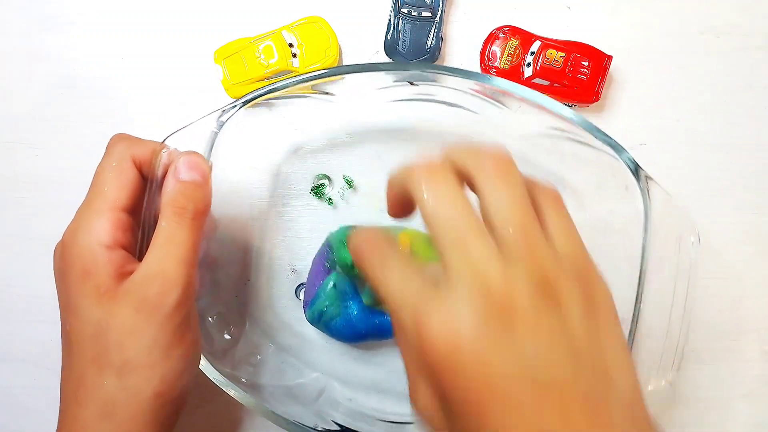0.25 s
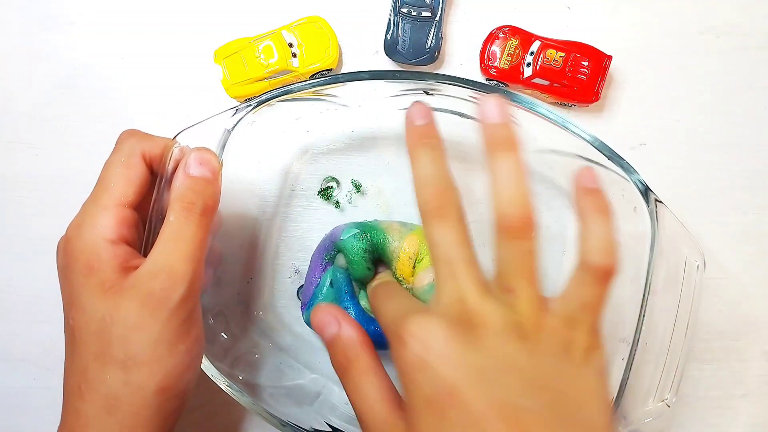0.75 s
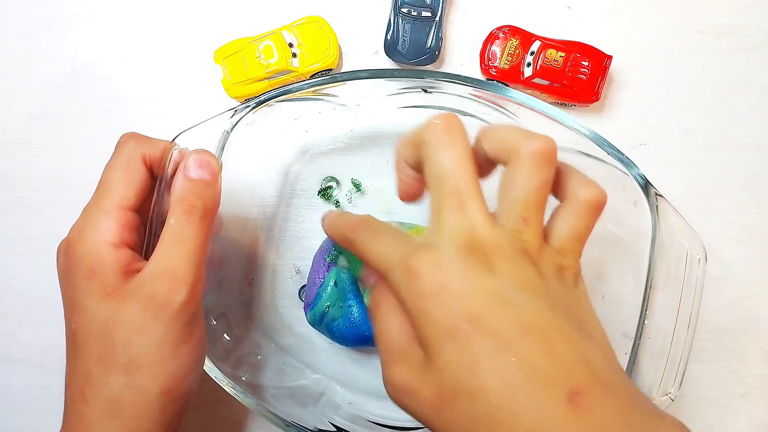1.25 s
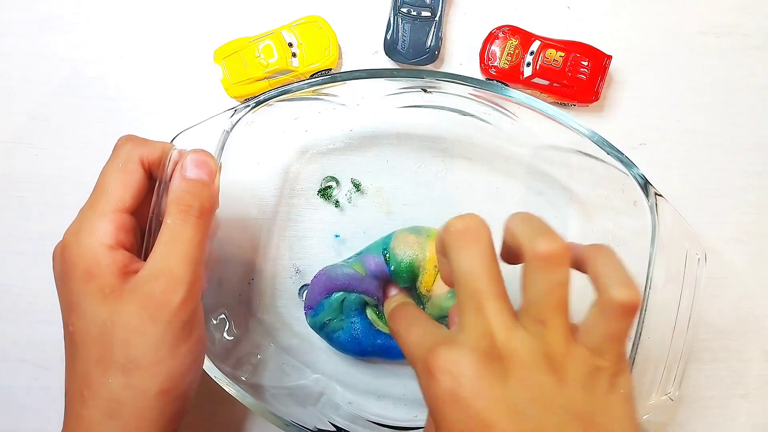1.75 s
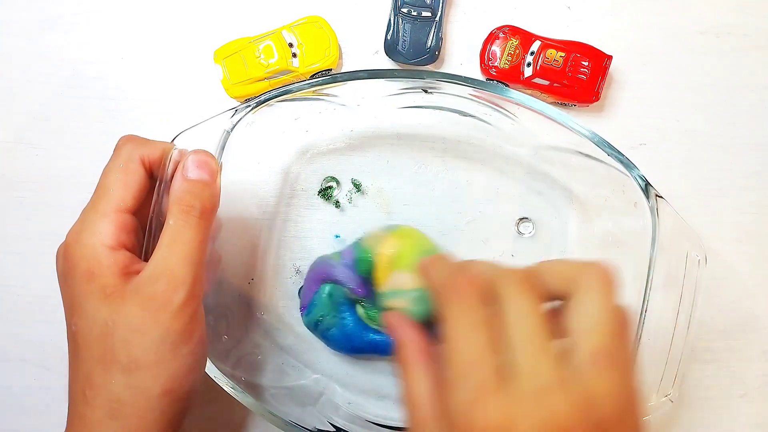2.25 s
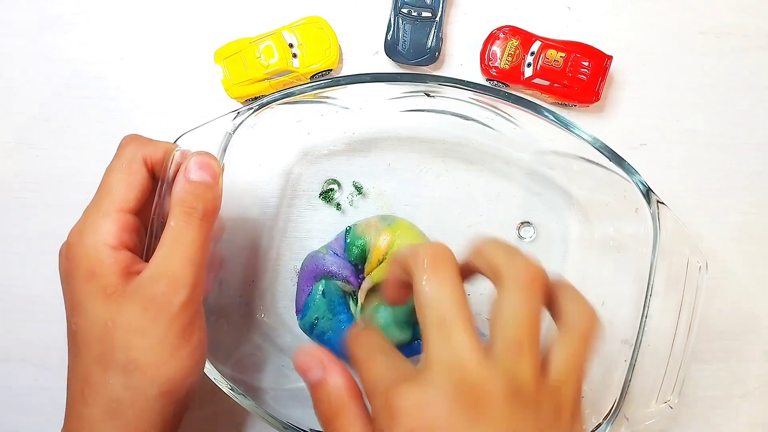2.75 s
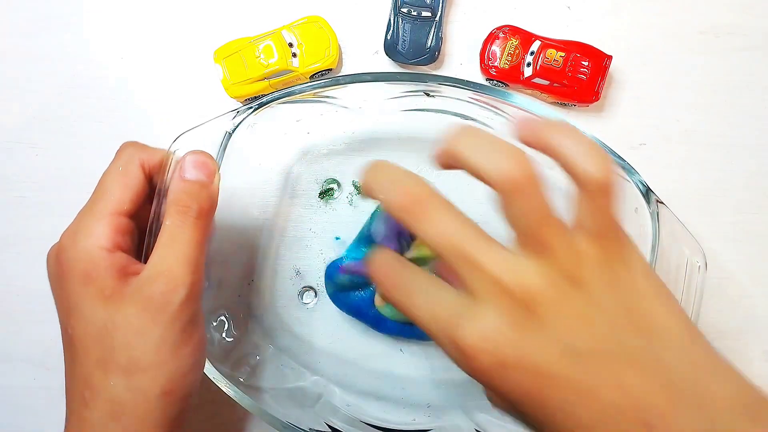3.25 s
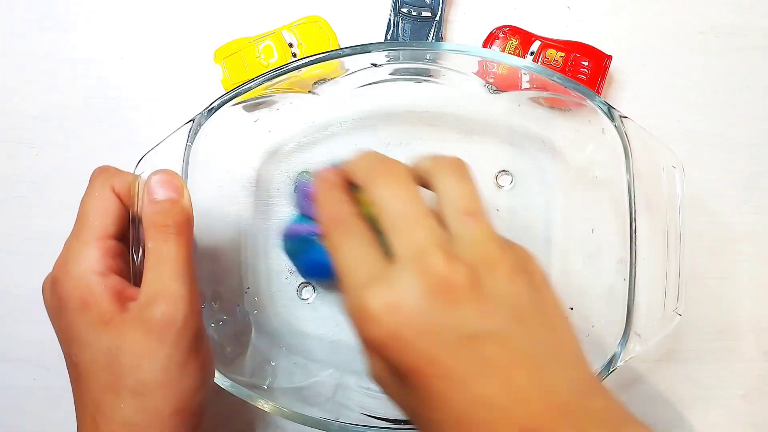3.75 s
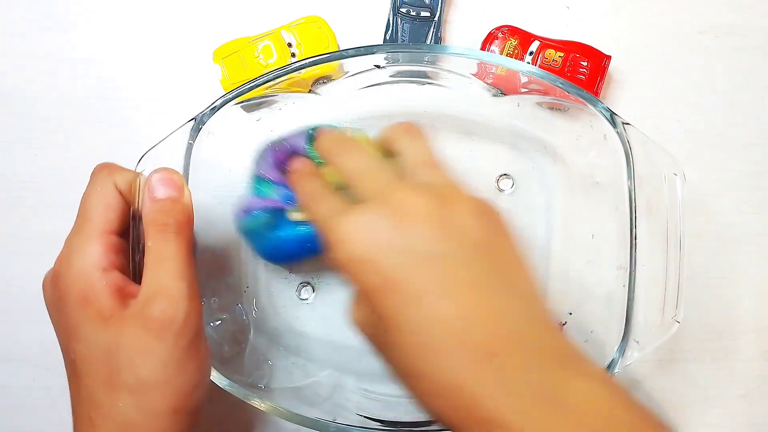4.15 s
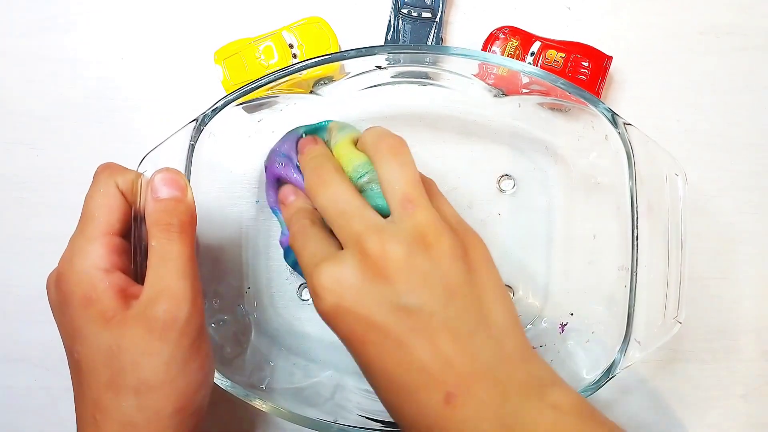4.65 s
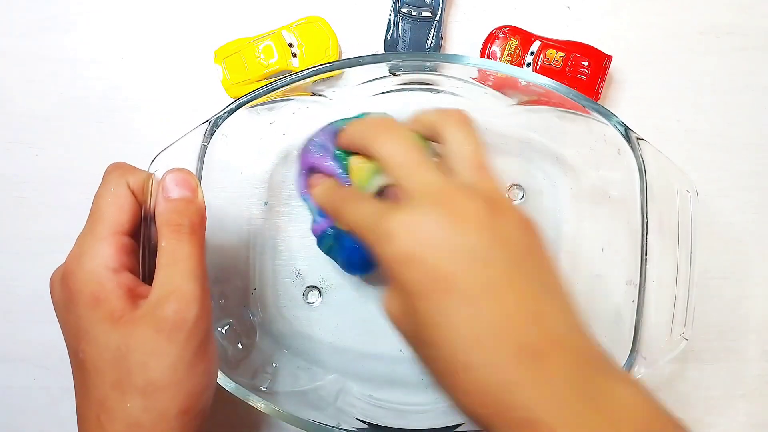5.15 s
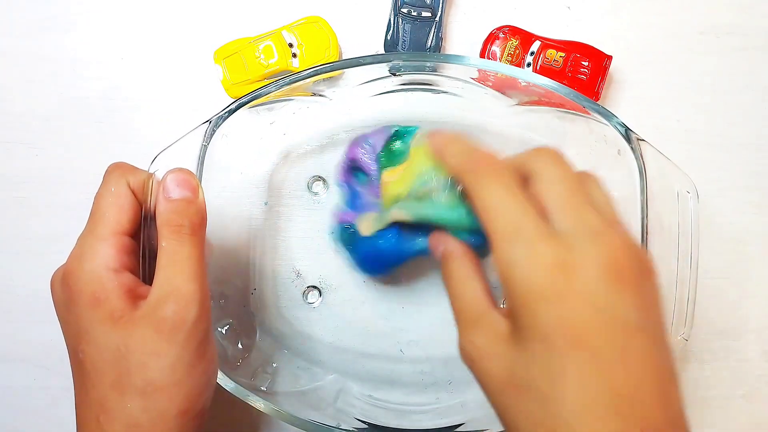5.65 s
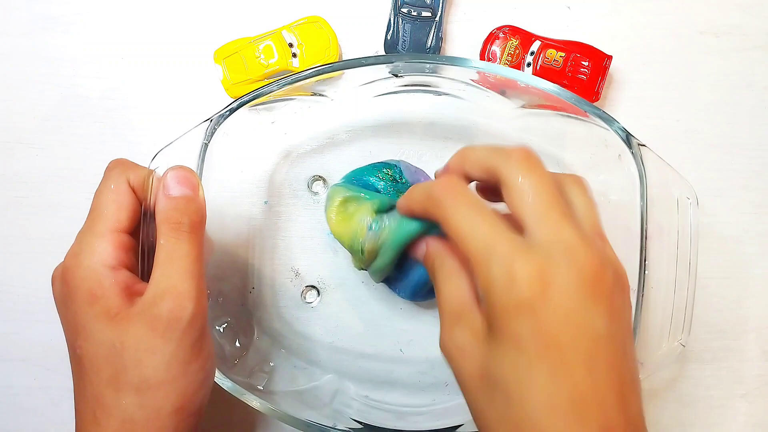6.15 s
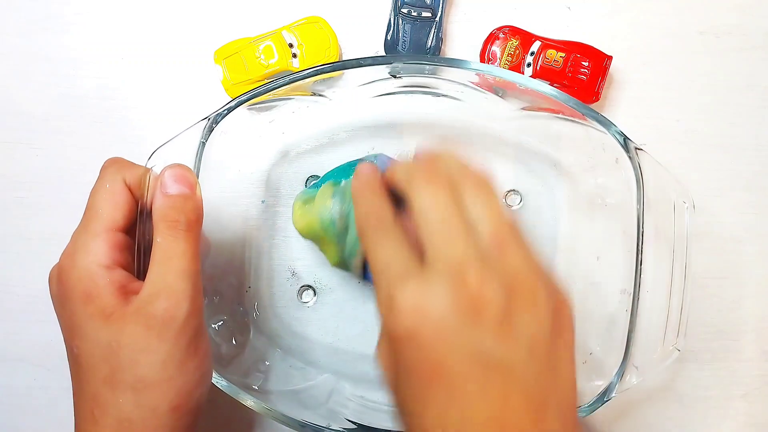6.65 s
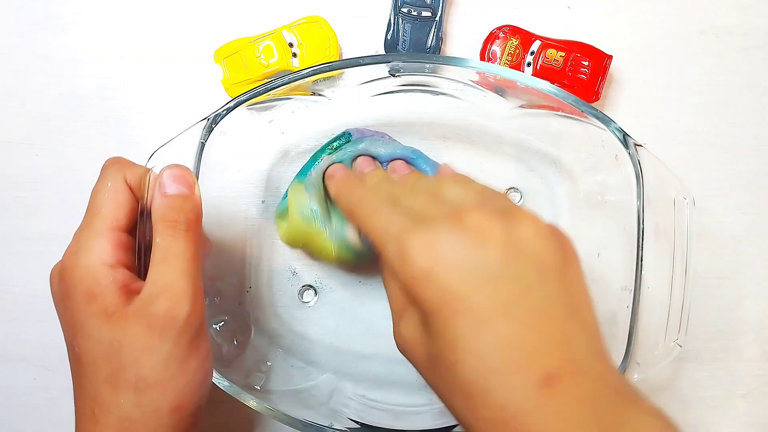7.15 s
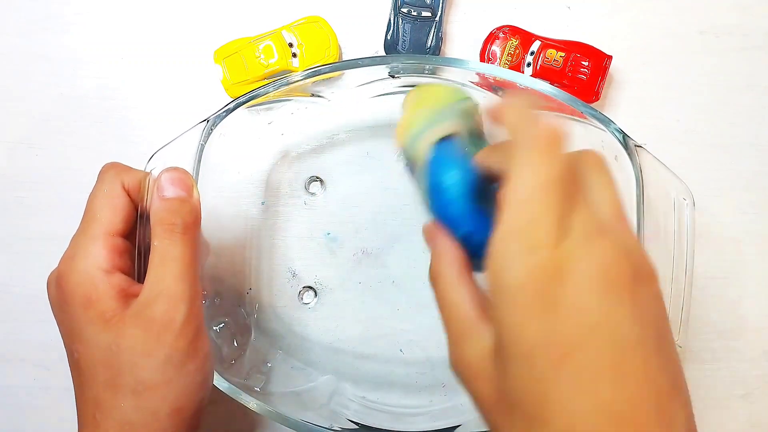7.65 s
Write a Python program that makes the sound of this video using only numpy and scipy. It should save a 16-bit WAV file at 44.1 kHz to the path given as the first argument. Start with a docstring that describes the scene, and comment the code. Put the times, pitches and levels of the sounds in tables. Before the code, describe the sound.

Close stereo microphone in a quiet room. Fingers squeeze slime in a glass dish with soft wet squishes and tiny air pops. Near one second a hard push thumps the table and taps the glass. Further low thumps, short dull drags of the dish and sticky peels follow, with squelches and pops continuing to the end.

```python
"""A quiet room: a hand kneads slime in a glass dish on a table, close to a two-port microphone.
Soft wet squeezes and small pops open the scene, and the dish drags in strokes from the start until
about 6.6 s; near 0.9 s a hard push thumps the table and taps the glass, and more thumps follow.
Squeezes, peels and pops run on to the end. Struck bodies are sums of decaying sines;
rubbing, hiss and puffs are shaped noise."""
import sys
import numpy as np
from scipy import signal
from scipy.fft import rfft, irfft
from scipy.io import wavfile
from scipy.ndimage import uniform_filter1d

SR = 44100
rng = np.random.default_rng(int(sys.argv[2]) if len(sys.argv) > 2 else 0)


def digitize_waveform(pressure):
    """Quantize a signal to 16-bit integers and store it at the path in sys.argv[1].

    Rows of a 2-D input are taken as channels; values are limited to [-1, 1].
    """
    field = np.atleast_2d(pressure).T
    bounded = np.clip(field, -1, 1)
    quanta = np.round(bounded * 32767).astype(np.int16)
    wavfile.write(sys.argv[1], SR, quanta)


N = 348390  # samples, 7.9 s
TOP_HZ = 15750  # upper limit of the sliding, peeling, hiss and room noise


def gain_of(db):
    """Amplitude factor for a level in dB."""
    return 10 ** (np.asarray(db) / 20)


def evened(x):
    """The same signal at rms 1."""
    return x / np.sqrt(np.mean(x ** 2) + 1e-20)


def read(points, hz):
    """Value of a (Hz, value) curve at hz, interpolated over log frequency."""
    point_hz, value = np.transpose(points)
    return np.interp(np.log(hz + 1), np.log(point_hz + 1), value)


def add(mix, start_s, sound):
    """Lays a sound into the mix, cut off at the end of the mix."""
    part = mix[round(start_s * SR):][:len(sound)]
    part += sound[:len(part)]


def shape(x, gain):
    """Multiplies the spectrum of x by gain(hz)."""
    size = x.shape[-1]
    return irfft(rfft(x) * gain(np.fft.rfftfreq(size, 1 / SR)), size)


def flutter(span_s, depth_db):
    """Random gain of rms 1 that changes within span_s."""
    wander = evened(uniform_filter1d(rng.standard_normal(N), int(span_s * SR)))
    return evened(gain_of(depth_db * wander))


def ring(modes):
    """Response of a body to one sharp blow: each mode is a sine dying by 60 dB in its t60."""
    t = np.arange(SR // 3) / SR
    return sum(gain_of(db - 60 * t / t60) * np.sin(2 * np.pi * hz * t) for hz, db, t60 in modes)


def damped(modes, factor):
    """The same modes dying sooner."""
    return [(hz, db, factor * t60) for hz, db, t60 in modes]


def blow(response, contact_s):
    """The response to a soft push, peak 1; a longer contact leaves only the low modes."""
    push = np.hanning(int(np.clip(contact_s, .0001, .03) * SR) + 3)
    body = signal.fftconvolve(response, push)
    return body / abs(body).max()


# every stroke swells, holds and lets go; it starts LEAD_S early
ATTACK_S, RELEASE_S, LEAD_S = 0.027, 0.049, 0.013
SWELL = 0.21  # share of the stroke's length added to both ramps


def effort(*parts, ramps=1):
    """Gain at every sample for (strokes, dB offset) pairs; overlapping strokes add in power."""
    power = np.zeros(N)
    for strokes, offset_db in parts:
        for start_s, length_s, db in strokes:
            t = np.arange(0, max(length_s, .01) + ramps * (LEAD_S + RELEASE_S), 1 / SR)
            rise = t / (ATTACK_S + SWELL * length_s)
            fall = (t[-1] - t) / (RELEASE_S + SWELL * length_s)
            swell = np.clip(np.minimum(rise, fall) / ramps, 0, 1)
            gain = gain_of(db + offset_db) * np.sin(np.pi / 2 * swell) ** 2
            add(power, max(start_s - ramps * LEAD_S, 0), gain ** 2)
    return np.sqrt(power)


def layers(strokes):
    """The main and the upper layer of strokes, each as (start s, length s, dB)."""
    main = [row[:3] for row in strokes]
    upper = [(start_s, length_s, db + upper_db) for start_s, length_s, db, upper_db in strokes]
    return main, upper


# The quiet room's noise colour. Each row: frequency in Hz, relative level in dB per Hz.
AIR_COLOUR = [(12, -61), (20, 5.5), (104, -7), (1170, -29.5), (2950, -34.5), (3290, -34), (5750, -38),
              (8270, -44.5), (10900, -44.5), (13700, -38), (15700, -36.5)]
AIR_DB = -43  # rms of the room noise
# How alike the room noise is at the two ports. Each row: frequency in Hz, likeness from 0 to 1.
PORT_LIKENESS = [(60, .85), (400, .6), (2000, .3), (15000, .1)]


def air():
    """Room noise and microphone hiss: coloured noise, partly alike in both ports."""
    left, other = rng.standard_normal((2, N))
    same = lambda hz: np.clip(read(PORT_LIKENESS, hz), -1, 1)
    right = shape(left, same) + shape(other, lambda hz: np.sqrt(1 - same(hz) ** 2))
    colour = lambda hz: gain_of(read(AIR_COLOUR, hz)) * (hz < TOP_HZ)
    return gain_of(AIR_DB) * evened(shape(np.array([left, right]), colour))


# How fast the room's reflections die. Each row: frequency in Hz, t60 in seconds.
ROOM_T60 = [(200, .15), (2000, .12), (15000, .08)]
# Colour of the reflections. Each row: frequency in Hz, gain in dB.
ROOM_COLOUR = [(100, -11.5), (400, 0), (3000, -10.5), (15000, -2.5)]


def room(x):
    """Sparse reflections of random sign, each band dying at its own speed."""
    taps = np.zeros((2, SR // 2))
    at = np.arange(120, SR // 2 - 20, 20)
    at = at + rng.integers(0, 20, (2, len(at)))
    np.put_along_axis(taps, at, rng.choice([-1., 1.], at.shape), 1)
    hz, t, bands = signal.stft(taps, SR, nperseg=256)
    fade = gain_of(-60 * t / read(ROOM_T60, hz)[:, None])
    tail = signal.istft(bands * fade, SR, nperseg=256)[1]
    wet = signal.fftconvolve(x[None], tail / np.linalg.norm(tail[0]), axes=1)[:, :N]
    return shape(wet, lambda f: gain_of(read(ROOM_COLOUR, f)))


# Modes of the table top under the dish.
# Each row: frequency in Hz, relative level in dB, undamped t60 in seconds.
TABLE_MODES = [(65.8, -32, 0.53), (103.3, -1, 0.072), (180.6, -11.5, 0.23), (202.4, -1, 0.16),
               (281.5, -12, 0.055), (321, 7.5, 0.037), (395, -6, 0.053), (479, -16, 0.17)]
# Pushes and sliding jolts that thump the table. Each row: start in seconds, level in dB before the
# signed factor, contact time in seconds, signed factor setting strength and polarity of the thump.
TABLE_THUMPS = [(0.922, 5.5, 0.0059, -0.17), (.936, 1, 0.003, 0.55), (.945, -5, 0.0062, 0.63),
                (1.93, 1.5, 0.005, 0.19), (1.946, -4.5, 0.0065, 0.47), (2.308, -25.5, 0.006, -1.17),
                (2.85, 6, 0.0035, -0.61), (3.431, -11.5, 0.0042, 1), (3.528, -12.5, 0.0075, -0.52),
                (3.8, -19, 0.0036, -0.45), (4.278, -32, 0.0015, -0.64), (4.687, -18, 0.0062, -0.32),
                (5.413, -5, 0.0034, 0.41), (6.723, -16.5, 0.0092, -0.98), (6.951, -22, 0.0034, -0.083),
                (7.409, -28, 0.016, -1.26)]


def thumps():
    """Pushes and jolts on the table: soft blows that ring its modes."""
    out = np.zeros(N)
    # slow motion radiates little: high-pass around 90 Hz
    table = signal.lfilter([1, -1], [1, -np.exp(-2 * np.pi * 90 / SR)], ring(TABLE_MODES))
    for start_s, db, contact_s, signed_factor in TABLE_THUMPS:
        add(out, start_s, signed_factor * gain_of(db) * blow(table, contact_s))
    return out


# The hand leans its weight on the table. Each row: start in seconds, length in seconds, level in dB.
WEIGHT_STROKES = [(.771, 0.14, -36), (.962, 0.096, -32.5), (1.537, 0.34, -49), (1.997, 0.036, -38),
                  (2.282, 0.13, -35), (2.891, 0.062, -37), (3.799, 0.11, -35.5), (4.033, 0.17, -41.5),
                  (4.279, 0.055, -39.5), (4.742, 0.19, -43.5), (5.15, 0.2, -45), (5.395, 0.12, -33),
                  (6.727, 0.31, -38.5), (7.809, 0.26, -42)]
# The dish slides on the table. Each row: start in seconds, length in seconds, level in dB.
SLIDE_STROKES = [(.08, 0.24, -38.5), (1.742, 0.0083, -34.5), (3.31, 0.21, -30.5), (3.39, 0.034, -25),
                 (3.799, 0.025, -40), (4.577, 0.29, -40), (4.643, 0.062, -30), (5.395, 0.16, -53),
                 (5.842, 0.096, -31.5), (5.98, 0.064, -35), (6.2, 0.27, -41.5), (6.5, 0.061, -40.5)]
SLIDE_ROCKS_DB, SQUISH_ROCKS_DB = -10, -5.5  # what a slide and a squeeze pass on to the rocking
SQUISH_DRAGS_DB = -1  # what a squeeze passes on to the dragging dish
TABLE_DAMPING = 0.72  # factor on the table t60 while the dish rubs on it


def drag():
    """The hand's weight rocks the two lowest table modes; stick-slip jolts of the dish shake the rest."""
    squeeze = layers(SQUEEZES)[0]
    weight = signal.fftconvolve(rng.standard_normal(N), ring(TABLE_MODES[:2]))[:N]
    jolts = signal.lfilter([1], [1, -.95], rng.standard_normal(N)) * flutter(.02, 2.)
    jolts = signal.fftconvolve(jolts, ring(damped(TABLE_MODES[2:], TABLE_DAMPING)))[:N]
    rocking = effort((WEIGHT_STROKES, 0), (SLIDE_STROKES, SLIDE_ROCKS_DB), (squeeze, SQUISH_ROCKS_DB))
    dragging = effort((SLIDE_STROKES, 0), (squeeze, SQUISH_DRAGS_DB))
    return rocking * evened(weight) + dragging * evened(jolts)


# Rasp of the glass foot on the table. Each row: frequency in Hz, relative level in dB per Hz.
SCRAPE_COLOUR = [(200, -2), (500, -6), (1300, -2.5), (3000, -7), (6000, -28), (15700, -28)]
SLIDE_SCRAPES_DB = -11.5  # what a slide passes on to the scrape


def scrape():
    """Smooth, dull rasp of the sliding dish: coloured noise with a fast, slight flutter."""
    grit = rng.standard_normal(N) * flutter(0.0018, 0.99)
    rasp = shape(grit, lambda hz: gain_of(read(SCRAPE_COLOUR, hz)))
    return effort((SLIDE_STROKES, SLIDE_SCRAPES_DB)) * evened(rasp)


# Modes of the glass dish. Each row: frequency in Hz, relative level when tapped in dB,
# free t60 in seconds.
GLASS_MODES = [(510, -18, .06), (829, 4, .09), (1245, -20, .2), (1437, -6, .3), (1960, -21, .34),
               (2640, -20, .1), (3295, -20, .32), (3710, -30, .26), (4258, -10, .3), (4810, -30, .2),
               (5545, -26, .25), (5880, -35, .25)]
# The glass is tapped and bounces. Each row: start in seconds, peak level in dB, contact time in seconds
# (blow holds it to 0.1 ms or more).
GLASS_TAPS = [(.9235, -15, 0.00008), (.9380, -29, 0.00033), (.9477, -28.5, 0.00023), (1.93, -31.5, .001)]


def knocks():
    """Taps on the glass: a loud start muffled by the hand, then the free ring."""
    out = np.zeros(N)
    response = ring(GLASS_MODES) + 2.5 * ring(damped(GLASS_MODES, .12))
    for start_s, db, contact_s in GLASS_TAPS:
        add(out, start_s, gain_of(db) * blow(response, contact_s))
    return out


# Slime peels off the glass and rings one mode most, the others more faintly. Each row: mode in Hz,
# what any squeeze passes on to it in dB, strokes; each stroke: start in seconds, length in seconds,
# level in dB before the skid joins.
PEEL_STROKES = [(510, -29, [(1.13, .32, -53.5)]), (829, -17, [(2.67, 0.081, -50.5)]),
                (1960, -15, [(1.27, 0.014, -55.5), (2.09, 0.096, -55), (2.43, 0.099, -61.5),
                (3.645, 0.023, -46.5), (4.287, 0.047, -51.5), (4.345, 0.045, -52.5), (4.66, 0.043, -40),
                (4.785, 0.015, -48), (4.845, 0.034, -59), (5.045, 0.047, -59), (5.553, 0.098, -56),
                (7.2, 0.14, -61), (7.43, 0.085, -63)]), (3295, -18.5, [(.15, 0.099, -58.5),
                (3.38, 0.11, -49), (4.352, 0.019, -44.5), (4.68, 0.083, -60), (4.788, 0.0081, -51.5),
                (4.845, 0.019, -58.5), (5.048, 0.029, -57), (5.44, 0.072, -61), (5.625, 0.037, -62),
                (5.85, 0.08, -51), (5.99, 0.045, -55), (6.305, 0.034, -57.5), (7.33, 0.087, -61),
                (7.43, 0.11, -57)]), (3710, -23.5, [(7.23, 0.1, -60)]), (4810, -28, [(7.35, .25, -67)]),
                (5545, -25, [(3.37, 0.11, -56), (5.41, 0.04, -57.5), (7.325, 0.035, -61)]),
                (5880, -19, [(6.3, 0.087, -58.5), (7.23, 0.047, -57)])]
PEEL_RAMPS = 0.087  # factor on the ramps: peeling starts and stops faster than other strokes
SLIME_DAMPING, SKID_DAMPING, SKID_DB = .2, .04, -3  # factors on glass t60, clinging or skidding; skid level
PEEL_SPILL_DB = -16  # a peel also stirs the other modes
POP_TUG_DB = -17  # a pop tugs the glass less than a squeeze by this
SLIP_S, SLIP_DB = .005, 3.5  # length and unevenness of the slips


def rub(bursts):
    """Peeling slime tugs glass modes in grainy slips with a rougher skid; squeezes and pops tug too."""
    out = 0
    squeeze = layers(SQUEEZES)[0]
    spilling = [stroke for row in PEEL_STROKES[2:] for stroke in row[2]]
    for mode_hz, squeeze_db, strokes in PEEL_STROKES:
        mode = [min(GLASS_MODES, key=lambda row: abs(row[0] - mode_hz))]
        spill_db = PEEL_SPILL_DB + squeeze_db - PEEL_STROKES[2][1]
        gain = effort((strokes, 0), (spilling, spill_db), ramps=PEEL_RAMPS)
        gain = gain + effort((squeeze, squeeze_db))
        for factor, db in (SLIME_DAMPING, 0), (SKID_DAMPING, SKID_DB):
            response = ring(damped(mode, factor))
            slips = rng.standard_normal(N) * flutter(SLIP_S, SLIP_DB) * gain
            tugs = slips + gain_of(squeeze_db + POP_TUG_DB) * bursts
            out = out + signal.oaconvolve(tugs * gain_of(db), response / np.linalg.norm(response))[:N]
    return out


# Air pockets bursting. Each row: start in seconds, peak level in dB, pitch in Hz,
# snap above the hollow puff in dB.
AIR_POCKETS = [(0.509, -26, 1510, 34), (0.524, -30, 5000, 15), (0.543, -24, 2030, 12),
               (0.7575, -19.5, 5900, -24), (0.9251, -15, 1600, -13), (1.498, -29.5, 3830, -3),
               (1.581, -25, 1900, 9.5), (1.7484, -16.5, 1110, -10.5), (2.381, -21, 1340, 2),
               (2.8506, -7.5, 2010, -20), (3.0697, -28, 4950, -14), (3.143, -24.5, 1160, 5),
               (3.32, -22.5, 1400, 1), (3.695, -22, 1820, 1), (3.8085, -19.5, 1870, 3),
               (3.908, -24.5, 840, -0.5), (4.288, -28.5, 2000, -2.5), (5.1903, -24.5, 1720, 0.5),
               (5.2895, -26.5, 1030, -5), (5.4102, -24.5, 2030, -9), (5.488, -30, 2100, -21),
               (5.9872, -18, 1440, 2), (6.086, -27.5, 1940, 14), (6.122, -25.5, 5900, 6.5),
               (6.311, -28, 5800, 3), (6.385, -23, 6100, 1.5), (6.7642, -14, 5650, -9.5),
               (6.8535, -24.5, 1460, -8), (7.093, -25, 5400, -13), (7.142, -26.5, 2000, -19),
               (7.724, -28, 566, -7), (7.745, -28.5, 1300, -4), (7.858, -28, 5800, -5)]
POP_FOCUS, POP_BROAD = 5., .2  # sharpness of the pitch, share of plain puff
POP_T60, POP_RISE_S = 0.0086, 0.0012  # seconds
POP_SPREAD = 0.71  # share that differs between the ports


def pops():
    """Each pocket bursts as a short puff of noise around its pitch, with a bright snap on top."""
    out, t = np.zeros((2, N)), np.arange(2048) / SR
    fade = gain_of(-60 * t / POP_T60) * np.minimum(t / POP_RISE_S, 1)
    for start_s, db, pitch_hz, snap_db in AIR_POCKETS:
        puffs = rng.standard_normal((3, 2048))
        puff = np.sqrt(1 - POP_SPREAD ** 2) * puffs[0] + POP_SPREAD * puffs[1:]
        band = lambda hz: (hz > 500) / (1 + (hz / 6200) ** 8)
        peak = lambda hz: 1 / (1 + (POP_FOCUS * np.log((hz + 1) / pitch_hz)) ** 2)
        hollow = shape(puff, lambda hz: band(hz) * (POP_BROAD + peak(hz)))
        snap = shape(puff, lambda hz: 1 / (1 + (9500 / (hz + 1)) ** 6))
        burst = fade * (evened(hollow) + gain_of(snap_db) * evened(snap))
        add(out.T, start_s, gain_of(db) * burst.T / abs(burst).max())
    return out


def bubbles(count=14):
    """Trapped bubbles collapse with a few cycles of rising pitch; a few are large."""
    out = np.zeros(N)
    for hz in np.geomspace(700, 14000, count):
        turns = np.arange(int(6 * SR / hz)) * hz / SR  # cycles since the collapse began
        chirp = turns * np.exp(-turns) * np.sin(2 * np.pi * turns * (1 + .03 * turns))
        sizes = gain_of(4 * np.minimum(rng.exponential(1, N), 3.5))
        sizes = sizes * (rng.random(N) < 90 / SR)  # about 90 a second at each pitch
        out += signal.oaconvolve(sizes, hz * chirp)[:N]
    return evened(out)


PATCH_DB = 3  # depth of the colour shifts


def patchy(x):
    """Pockets open and close: random gain patches over time and frequency, about 600 Hz by 25 ms."""
    z = signal.stft(x, nperseg=256, noverlap=192)[2]
    patches = rng.standard_normal(z.shape[:0:-1]).T
    patches = uniform_filter1d(patches, size=4, axis=0)
    patches = evened(uniform_filter1d(patches, size=16, axis=1))
    return signal.istft(z * gain_of(PATCH_DB * patches), nperseg=256, noverlap=192)[1][:, :N]


# Colour of the wet hiss. Each row: frequency in Hz, relative level in dB per Hz.
WET_COLOUR = [(400, -15), (800, 11), (2000, 5), (4000, 7), (6500, -12.5), (8300, -28), (11000, -29.5),
              (12500, -26.5), (15700, -24)]
# Fingers squeeze the slime. Each row: start in seconds, length in seconds, wet squish level in dB,
# fizz above the squish in dB.
SQUEEZES = [(0, 0.17, -56.5, 1.5), (.48, 0.15, -50.5, -18), (.724, 0.036, -45.5, -2.5),
            (1.245, 0.3, -58, -0.5), (1.537, 0.15, -53, -12), (1.742, 0.014, -49.5, -2),
            (2.066, 0.095, -51.5, 0), (2.282, 0.16, -55.5, -4), (2.4, 0.19, -49, -22),
            (2.641, 0.039, -39.5, -6.5), (2.891, .1, -47, -3.5), (3.017, 0.08, -52, -1.5),
            (3.157, 0.13, -55.5, -5), (3.535, 0.16, -48, -3.5), (3.799, 0.015, -39.5, 1.5),
            (3.877, 0.13, -52.5, -11), (4.033, 0.062, -43.5, -2), (4.279, 0.17, -58, 1.5),
            (4.4, 0.54, -57.5, -2.5), (4.643, 0.051, -41.5, -2.5), (5.046, 0.052, -47, -1.5),
            (5.15, 0.17, -58.5, -1), (5.495, 0.09, -50, 0.5), (6.1, 0.2, -62, 5), (6.284, 0.21, -57, 4),
            (6.5, 0.024, -43.5, -0.5), (6.546, 0.2, -58.5, 5), (6.727, 0.2, -56.5, -17),
            (7.05, 0.099, -42, -2), (7.18, 0.38, -63, 8.5), (7.654, 0.17, -54.5, -3),
            (7.809, 0.1, -53, -4.5)]
SPREAD = .8  # share of the hiss that differs between the ports, the slime being a wide source


def squish():
    """Wet hiss with bubbles; the finest ones make a fizz of their own."""
    wet = lambda hz: gain_of(read(WET_COLOUR, hz)) * (hz < TOP_HZ)
    upper = lambda hz: 1 / (1 + (8500 / (hz + 1)) ** 6)
    hiss = rng.standard_normal((3, N))
    hiss = np.sqrt(1 - SPREAD ** 2) * hiss[0] + SPREAD * hiss[1:]
    source = patchy((hiss + .65 * bubbles()) * flutter(.012, 3.))
    body = evened(shape(source, lambda hz: wet(hz) * (1 - upper(hz))))
    fizz = evened(shape(source, lambda hz: wet(hz) * upper(hz)))
    squeeze, finest = layers(SQUEEZES)
    return effort((squeeze, 0)) * body + effort((finest, 0)) * fizz


# Tilt between the ports. Each row: frequency in Hz, left minus right in dB.
PORT_TILT = [(3000, 0), (6000, 1), (9000, 4), (13000, 6)]
LAG_S = 0.00014  # the right port hears the kneading hand later
NEAR_LAG_S = .00005  # glass and pops lie nearer the middle


def scene():
    """The dish, its reflections and the room at two ports, the right port later and duller."""
    below_top = lambda hz: hz < TOP_HZ
    aside = shape(thumps() + drag() + scrape(), below_top) + squish()
    bursts = pops()
    ahead = shape(rub(bursts[0]), below_top) + knocks() + bursts
    late = lambda lag_s: lambda hz: np.exp(-2j * np.pi * hz * np.array([[0], [lag_s]]))
    direct = shape(aside, late(LAG_S)) + shape(ahead, late(NEAR_LAG_S))
    reflected = room(aside[0] + ahead[0])
    side = np.array([[.5], [-.5]])
    return shape(direct + reflected, lambda hz: gain_of(side * read(PORT_TILT, hz))) + air()


EDGE_HZ = 16700  # band limit of the microphone signal


def record(dry):
    """Hard ceiling at full scale, then a steep low-pass as the band limit."""
    low_pass = signal.firwin(511, EDGE_HZ, window=("kaiser", 9), fs=SR)
    return signal.oaconvolve(np.clip(dry, -1, 1), low_pass[None], "same")


dry = scene()
out = record(dry)
digitize_waveform(out)
```